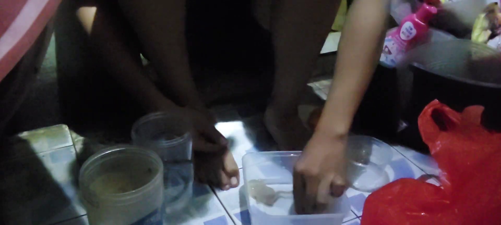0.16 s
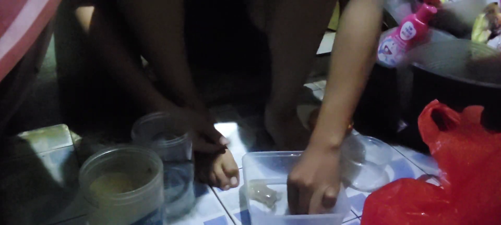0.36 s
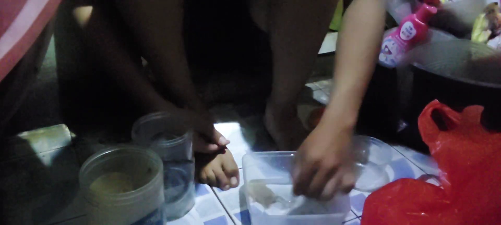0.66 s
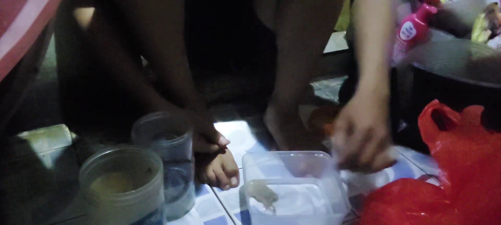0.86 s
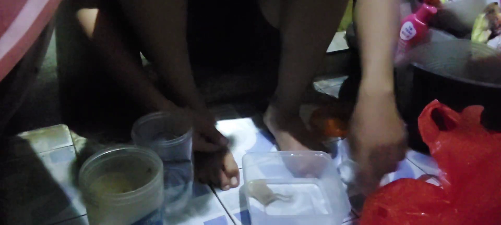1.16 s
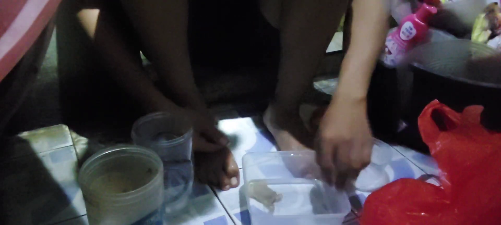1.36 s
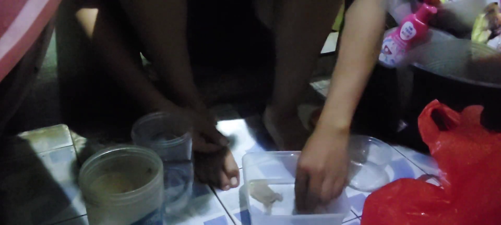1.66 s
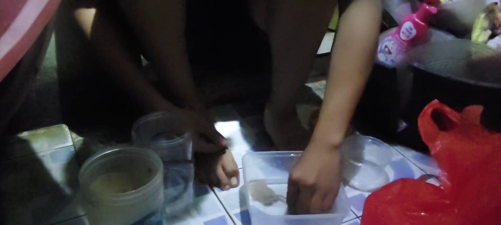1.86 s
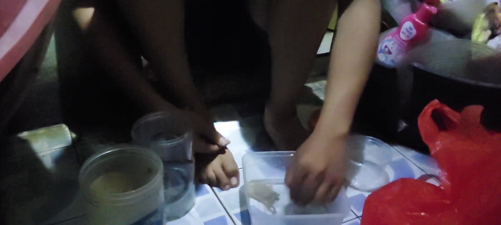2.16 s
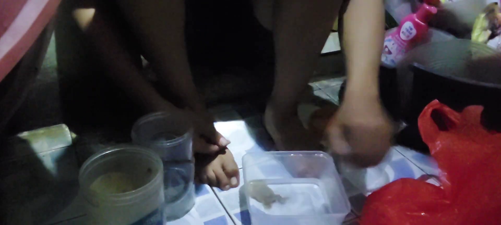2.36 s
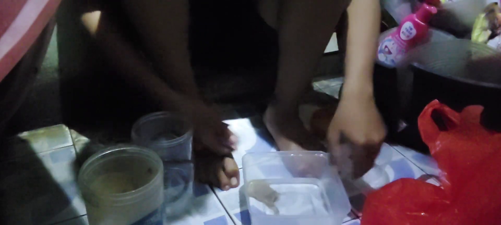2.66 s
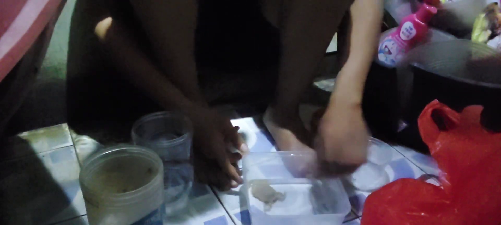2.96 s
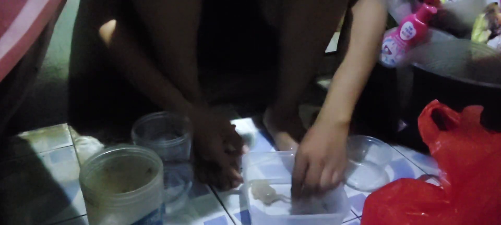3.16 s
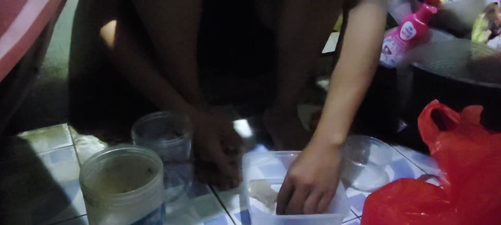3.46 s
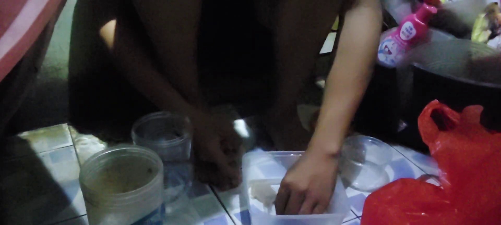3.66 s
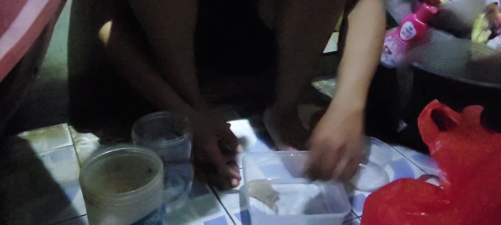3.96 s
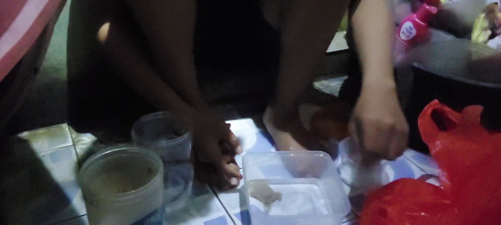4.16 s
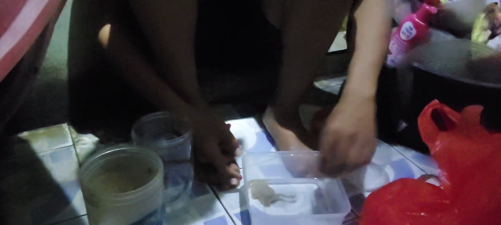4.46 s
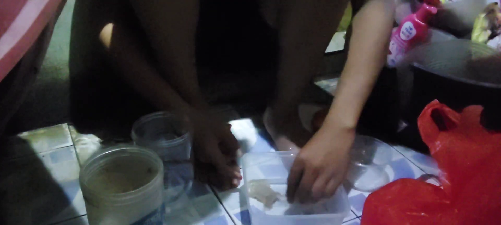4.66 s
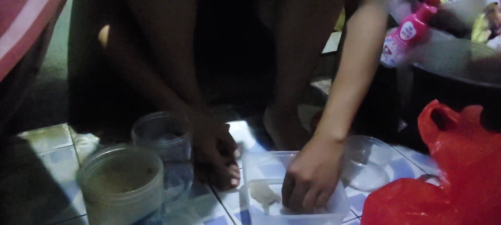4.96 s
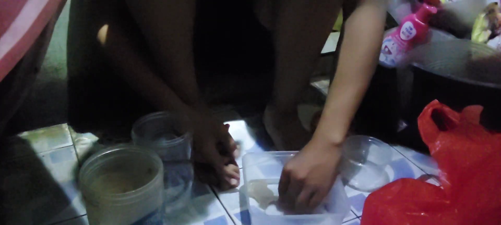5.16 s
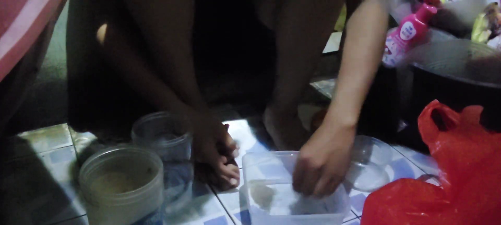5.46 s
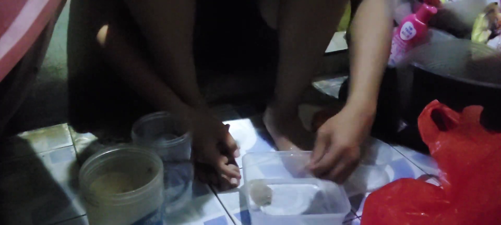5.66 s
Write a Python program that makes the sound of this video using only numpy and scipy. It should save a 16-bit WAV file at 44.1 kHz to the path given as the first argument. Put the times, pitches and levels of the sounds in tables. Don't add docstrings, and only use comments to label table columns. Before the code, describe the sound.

Low motorcycle-like drone swells and recedes beyond a tiled room, over katydid buzz, faint cricket chirps, motor whine and small plastic snaps.

```python
import sys
import numpy as np
from scipy import signal
from scipy.fft import rfft, irfft
from scipy.io import wavfile
from scipy.ndimage import uniform_filter1d

SR = 44100
rng = np.random.default_rng(int(sys.argv[2]) if len(sys.argv) > 2 else 0)


def decibels_to_gain(level_db):
    exponent = np.asarray(level_db, float) / 20
    return 10 ** exponent


def dump(signal):
    limited = np.clip(np.atleast_2d(signal).T, -1, 1)
    pcm = np.round(limited * 32767).astype(np.int16)
    wavfile.write(sys.argv[1], SR, pcm)


N = 255895
T = np.arange(N) / SR
PORTS = np.array([[1], [-1]])

# time in seconds, gain in dB.
CLOSENESS = [(0, -8.5), (.07, -8), (.26, -4.5), (.6, -3), (.95, -1.4), (1.19, 1.3), (1.3, -2.5), (1.55, -3),
             (1.65, -5.5), (2.55, -8), (2.85, -8), (3.45, -11), (4.1, -11.5), (4.38, -9), (5.08, -11),
             (5.21, -7), (5.45, -10), (5.8, -11)]


def curve(table):
    s, *columns = np.transpose(table)
    return [np.interp(T, s, c) for c in columns]


def tint(table, hz):
    f, db = np.transpose(table)
    return np.interp(np.log(np.maximum(hz, 1)), np.log(f), db, left=-99, right=-99)


def unit(x):
    return x / np.sqrt(np.mean(x ** 2))


def even(x):
    power = uniform_filter1d(np.mean(x ** 2, axis=0), int(.15 * SR))
    return x / np.sqrt(power)


def walk(rate):
    k = int(SR / rate)
    steps = np.repeat(rng.standard_normal(N // k + 1), k)
    return 1.38 * uniform_filter1d(uniform_filter1d(steps, k), k)[:N]


def noise(table):
    # frequency in Hz, left-right likeness from -1 to 1.
    likeness = [(60, 1), (130, 0.26), (290, 0.9), (640, 0.17), (1410, -0.14), (3100, -0.0025),
                (6820, -0.032), (15000, -0.081)]
    # frequency in Hz, left minus right in dB.
    lean = [(60, 0), (110, 6.5), (200, -1.5), (380, -3), (700, 3.5), (1290, -1), (2380, 2.5), (4400, 0),
            (8120, -1), (15000, 3.5)]
    hz = np.fft.rfftfreq(N, 1 / SR)
    like_hz, like_value = np.transpose(likeness)
    like = np.interp(np.log(hz + 1), np.log([30, *like_hz]), [.98, *like_value])
    like = np.clip(like, -.9, .98)
    lean_db = np.interp(hz, *np.transpose(lean))
    mid, side = rfft(rng.standard_normal((2, N))) * decibels_to_gain(tint(table, hz))
    mid, side = mid * np.sqrt(1 + like), side * np.sqrt(1 - like)
    left, right = (mid + side) * decibels_to_gain(lean_db / 2), (mid - side) * decibels_to_gain(-lean_db / 2)
    return unit(irfft(np.array([left, right]), N))


def night_air():
    # frequency in Hz, level in dB per Hz.
    spectrum = [(6000, -16), (6800, 6.5), (8400, -1), (9000, 0), (9900, 2), (10250, -2), (11000, -0.5),
                (12000, -0.5), (14000, -2), (14800, 1), (16000, -2.5)]
    level_db = -57 + 0.35 * curve(CLOSENESS)[0]
    return decibels_to_gain(level_db + 0.34 * walk(1.4)) * noise(spectrum)


def katydids():
    # frequency in Hz, level in dB per Hz.
    spectrum = [(3820, -37), (6500, -19), (6660, -15.5), (7230, 0), (7510, 4.5), (7900, -2.5), (8500, -27),
                (11000, -48.5), (18700, -120)]
    # throbs per second, depth in dB, phase in turns.
    groups = [(8.92, 2.11, .44), (10.44, 1.3, .19), (9.16, .91, .44), (8.72, .59, -.27)]
    throb_db = sum(db * np.cos(2 * np.pi * (rate * T + turns)) for rate, db, turns in groups)
    swell_db = np.cos(2 * np.pi * (T - 1.7) / 2.92)
    return decibels_to_gain(-46.5 + swell_db + 0.96 * throb_db + 0.59 * walk(67)) * noise(spectrum)


def cricket(hz=4107):
    # start in seconds, length in seconds, level in dB.
    chirps = [(.3, 0.12, -59), (0.668, 0.1, -56), (1.034, 0.13, -58), (1.447, .2, -62), (1.886, .14, -59),
              (2.26, .16, -64), (2.63, 0.15, -60), (3.082, .14, -63), (3.5, .14, -66), (3.823, 0.27, -66.5),
              (4.223, 0.16, -63), (4.55, 0.29, -67), (5.098, 0.16, -63), (5.46, 0.17, -67)]
    gate = 0
    for start, length, db in chirps:
        edge = np.minimum(T - start, start + length - T)
        gate = gate + decibels_to_gain(db) * np.clip(3 * edge / length, 0, 1)
    neighbours = decibels_to_gain(-77 + 3.0 * walk(8))
    strokes = 1 + 0.31 * np.sin(2 * np.pi * 33 * T)
    wing = np.sin(2 * np.pi * hz * T + .6 * walk(20))
    tone = (gate + neighbours) * strokes * decibels_to_gain(1.5 * walk(30)) * wing
    return tone * decibels_to_gain(np.array([[.6], [-5.0]]))


def pump(hz=346.4, level_db=-42):
    whines = []
    for _ in PORTS:
        tone = np.sin(2 * np.pi * hz * T + walk(6))
        whines.append(decibels_to_gain(level_db + 1.9 * walk(6.9)) * tone)
    return np.array(whines)


def bursts(table, rise):
    out = 0
    for s, db, t60, low_hz, high_hz in table:
        age = np.maximum(T - s, 0)
        shape = np.minimum(age / (rise * t60), 1) * decibels_to_gain(-60 * age / t60)
        band = [(.7 * low_hz, -25), (low_hz, 0), (high_hz, -1), (1.25 * high_hz, -25)]
        crackle = decibels_to_gain(1.2 * walk(400)) * noise(band)
        out = out + decibels_to_gain(db) * shape * crackle
    return out


def creases():
    # start in seconds, level in dB, t60 in seconds, lowest and highest frequency in Hz.
    snaps = [
        (.953, -40.5, 0.13, 2500, 5000),
        (3.712, -43, 0.37, 970, 1680),
        (4.4075, -35.5, .08, 4940, 16400),
        (4.41, -48.5, 0.64, 4460, 16500),
        (5.37, -50, .2, 1800, 2400),
        (5.66, -55, 0.52, 9000, 16100),
    ]
    return bursts(snaps, rise=0.017)


def brushes():
    # start in seconds, level in dB, t60 in seconds, lowest and highest frequency in Hz.
    strokes = [(.2, -41, 1.5, 1140, 1400), (.22, -14, 0.42, 40, 59.3), (1.15, -59, .5, 2000, 6000),
               (1.4, -34, 1.4, 330, 440), (1.75, -30, 3.2, 187, 223), (2.25, -45, 0.85, 905, 1140),
               (2.27, -58, .3, 10000, 16300), (2.58, -45, 3.2, 1260, 1340),
               (2.77, -51.5, 0.85, 8500, 16500), (2.8, -48, 1.1, 3500, 8000),
               (2.85, -44.5, 0.84, 1190, 2000), (3.0, -35, 4.5, 158, 201), (3.36, -60, .4, 9002, 16000),
               (3.48, -47.5, 2.5, 182, 210), (3.52, -50.5, 3.9, 860, 1270), (4.3, -48.5, 2.7, 796, 1380)]
    return bursts(strokes, rise=0.049)


def street_low_db():
    return -30.5 + 0.55 * curve(CLOSENESS)[0] - 0.84 * T


def road():
    # frequency in Hz, level in dB per Hz.
    rumble_spectrum = [(12, -36), (20, -21), (48, -6), (82, -3.5), (105, -7.5), (166, -10), (257, -10),
                       (344, -6.5), (395, -20), (560, -29.5), (730, -44), (1230, -120)]
    roar_spectrum = [(250, -37), (420, -1), (563, -3.5), (713, -8.5), (1010, -6.5), (1130, -9),
                     (1310, -7.5), (1670, -16.5), (2000, -21), (2600, -37), (4400, -120)]
    hiss_spectrum = [(1120, -8.5), (1900, 1), (3120, -5.5), (4230, -6.5), (4300, -8.5), (4560, -9),
                     (4930, -7), (6530, -8.5), (6700, -14), (8710, -16.5), (14700, -120)]
    near_db = curve(CLOSENESS)[0]
    rumble_db = street_low_db() + 3.0
    roar_db = -37.5 + .95 * near_db + 0.02 * T
    hiss_db = -45 + .95 * near_db
    rumble = decibels_to_gain(rumble_db + 1.23 * walk(6.22)) * noise(rumble_spectrum)
    roar = decibels_to_gain(roar_db + 0.9 * walk(9)) * noise(roar_spectrum)
    hiss = decibels_to_gain(hiss_db + 0.76 * walk(12)) * noise(hiss_spectrum)
    return rumble + roar + hiss


def mode_swells():
    # start, peak and end in seconds, level in dB, left minus right in dB.
    crossings = [(-.05, 0.297, 2.8, -27, 4.5), (0.557, 1.125, 1.31, -20.5, 3.5),
                 (1.318, 1.536, 1.74, -15.5, 4.5), (1.69, 1.778, 2.33, -23, 7),
                 (1.896, 2.35, 2.82, -24, -0.5), (2.677, 2.91, 3.15, -29.5, 0),
                 (3.438, 3.85, 4.14, -29.5, -1), (4.26, 4.557, 4.69, -25, 3.5),
                 (4.702, 4.78, 4.93, -29.5, 3), (5.031, 5.12, 5.25, -33, 0),
                 (5.216, 5.32, 5.425, -35.5, -2), (5.415, 5.494, 5.75, -36, 4)]
    start, peak, end, db, pan_db = np.transpose(crossings)[:, :, None]
    rest, rest_pan_db = decibels_to_gain(-44) ** 2, -4.5
    ramp = np.clip(np.minimum((T - start) / (peak - start), (end - T) / (end - peak)), 0, 1)
    power = (decibels_to_gain(db) * np.sin(np.pi / 2 * ramp)) ** 2
    total = power.sum(axis=0) + rest
    lean_db = ((power * pan_db).sum(axis=0) + rest * rest_pan_db) / total
    return np.sqrt(total), lean_db


def firing_harmonics(count=22):
    # time in seconds, firing rate in Hz.
    speed = [(0, 20.3), (.24, 21.9), (.4, 22.6), (.65, 22.9), (1.07, 22.9), (1.19, 22.6), (1.33, 20.8),
             (1.49, 19.2), (1.62, 18.2), (1.72, 17.7), (2.1, 17.5), (2.75, 16.75), (3.4, 16.8),
             (4.5, 16.15), (5.3, 15.1), (5.8, 15.5)]
    # frequency in Hz, level in dB.
    boom_tint = [(25, -38), (33, -14.5), (46, -5), (55, -3), (65, 6), (74, -1.5), (86, -2), (97, -18),
                 (110, -41)]
    drone_tint = [(80, -40), (97, -18), (106, -5), (114, 0), (123, -5), (130, -19), (138, -11), (150, -26),
                  (170, -50)]
    rasp_tint = [(140, -39), (180, 9.5), (210, -1), (240, 4.5), (280, 1.5), (320, 1.5), (370, -21),
                 (440, -29)]
    hz = curve(speed)[0]
    turn = 2 * np.pi * np.cumsum(hz) / SR
    pull_db_per_octave = -26 * np.clip((1.8 - T) / .3, 0, 1)
    boom, drone, rasp = 0, 0, 0
    for k in range(2, count):
        fade, wander, apart = walk(2.473), walk(3.735), walk(1.59)
        lag = PORTS * np.minimum((k * hz / 105) ** 1.4, 1) * (0.24 + 0.28 * apart)
        tone = np.sin(k * turn + rng.uniform(0, 2 * np.pi) + 0.14 * wander + lag)
        boom_db = tint(boom_tint, k * hz) + pull_db_per_octave * np.log2(k / 2)
        boom = boom + decibels_to_gain(boom_db + 2.2 * fade) * tone
        drone = drone + decibels_to_gain(tint(drone_tint, k * hz) + fade) * tone
        rasp = rasp + decibels_to_gain(tint(rasp_tint, k * hz) + 6.7 * fade) * tone
    return even(boom), even(drone), even(rasp)


def engine():
    # time in seconds, frequency in Hz.
    hum_pitch = [(0, 116.6), (3.5, 116.7), (4.1, 115.5), (4.5, 114.1), (4.8, 116.5), (5.2, 116.1),
                 (5.8, 112.2)]
    # time in seconds, level in dB.
    load = [(0, -28), (.24, -29.5), (.6, -32), (1.55, -31.5), (1.72, -26), (2.3, -25), (3.09, -25.5),
            (3.45, -34), (3.75, -33), (4.1, -26.5), (4.55, -24.5), (4.66, -27), (4.76, -21), (4.97, -29),
            (5.13, -21), (5.3, -23), (5.6, -30.5), (5.8, -30.5)]
    # frequency in Hz, level in dB per Hz.
    thud = [(30, -30), (45, -12.5), (60, -4), (75, -10.5), (92, -12.5), (105, -31)]
    boom, drone, rasp = firing_harmonics()
    mode, pan_db = mode_swells()
    lean_db = PORTS * pan_db / 2

    hum_turn = 2 * np.pi * np.cumsum(curve(hum_pitch)[0]) / SR
    hum = np.sqrt(2) * np.sin(hum_turn + 0.56 * walk(5.2) + PORTS * 0.11 * walk(1.46))
    far = np.clip((T - 3.42) / 0.32, 0, .9)
    drone = np.sqrt(1 - far ** 2) * drone + far * hum

    smear = 0.34 + 0.034 * T
    boom = even(np.sqrt(1 - smear ** 2) * boom + smear * noise(thud))

    boom = decibels_to_gain(curve(load)[0] + 0.44 * lean_db) * boom
    drone = mode * decibels_to_gain(lean_db) * drone
    rasp = decibels_to_gain(street_low_db() - 4.0 - 1.3 * T) * rasp
    return boom + drone + rasp


def scene():
    insects = katydids() + cricket()
    hands = creases() + brushes()
    return night_air() + insects + pump() + hands + road() + engine()


def top_cut(x):
    return signal.sosfilt(signal.butter(12, 16490, fs=SR, output="sos"), x)


def record(dry):
    bass = signal.butter(3, 36, "high", fs=SR, output="sos")
    top = signal.ellip(12, .2, 80, 15740, fs=SR, output="sos")
    mix = signal.sosfilt(np.vstack([bass, top]), dry)
    return top_cut(mix)


dry = scene()
out = record(dry)
dump(out)
```